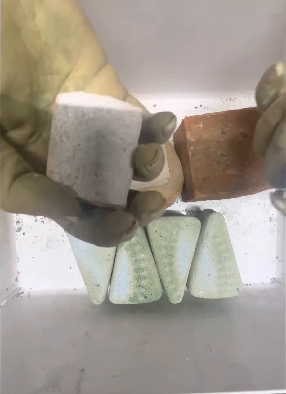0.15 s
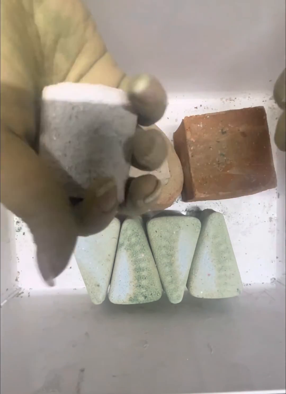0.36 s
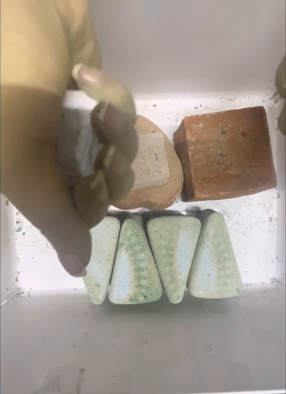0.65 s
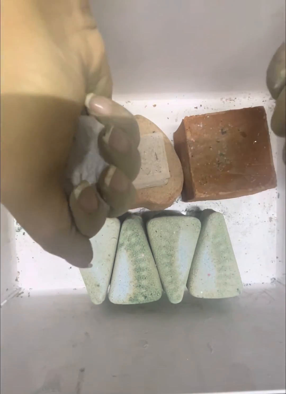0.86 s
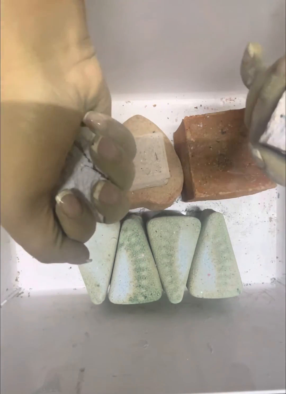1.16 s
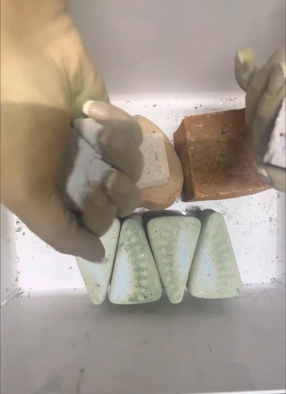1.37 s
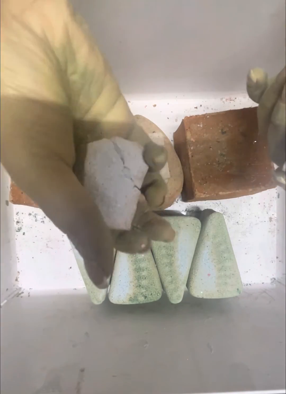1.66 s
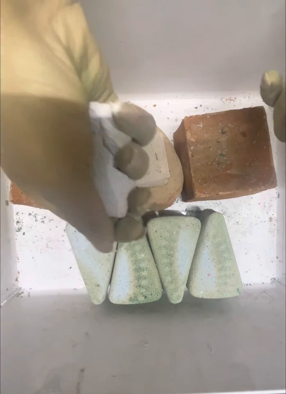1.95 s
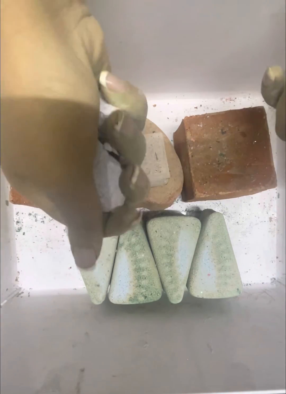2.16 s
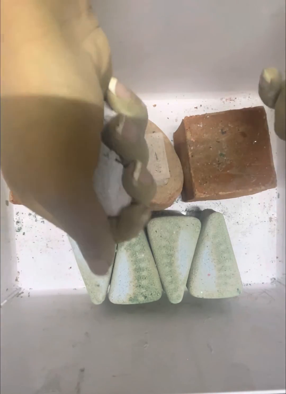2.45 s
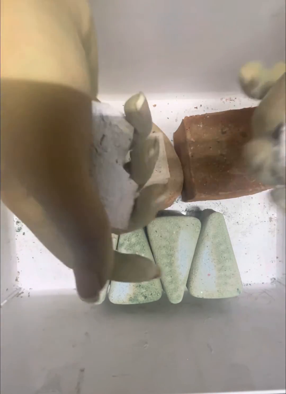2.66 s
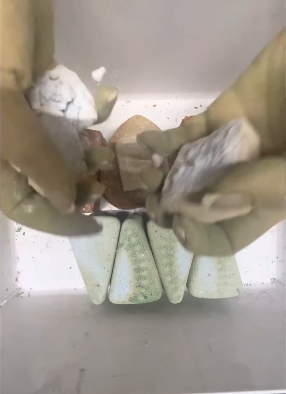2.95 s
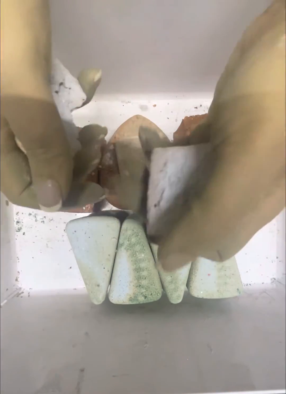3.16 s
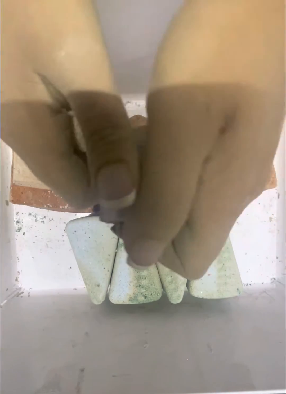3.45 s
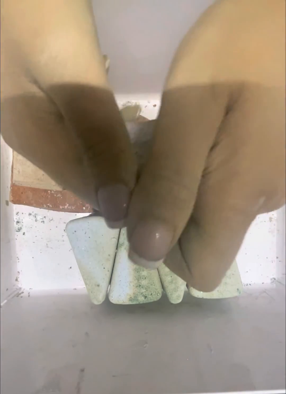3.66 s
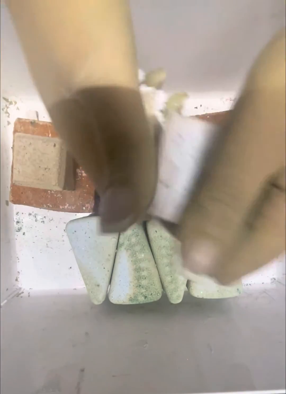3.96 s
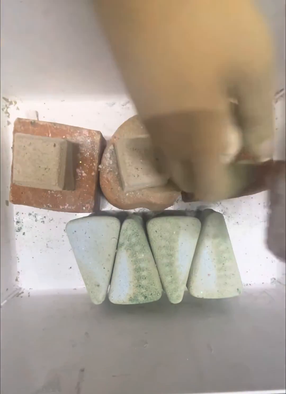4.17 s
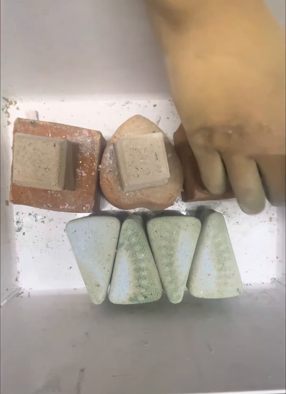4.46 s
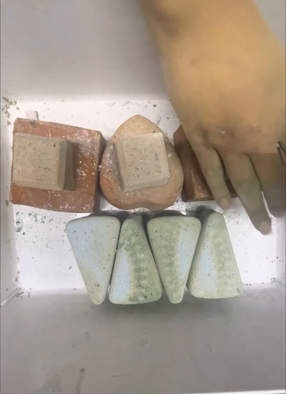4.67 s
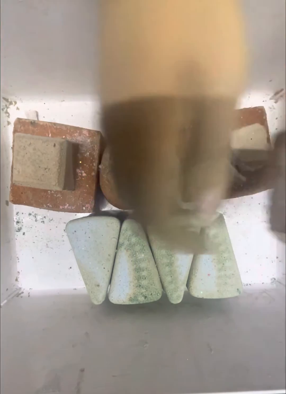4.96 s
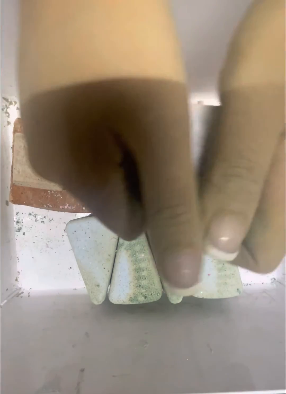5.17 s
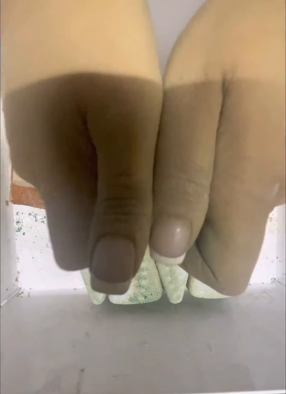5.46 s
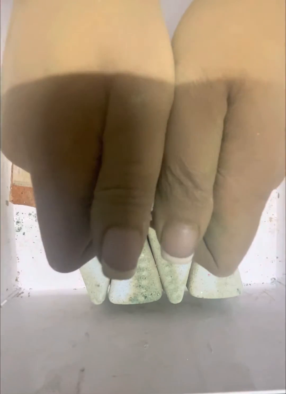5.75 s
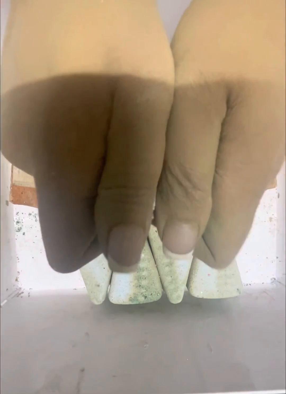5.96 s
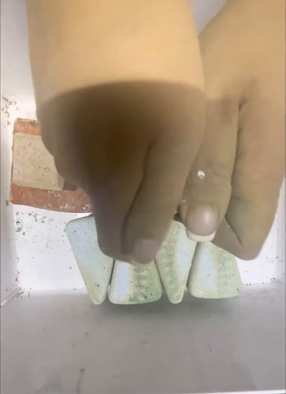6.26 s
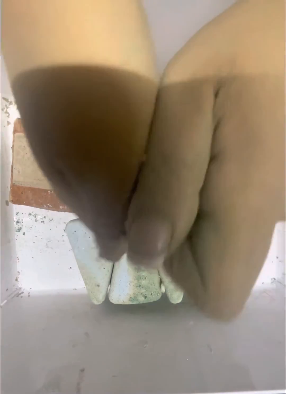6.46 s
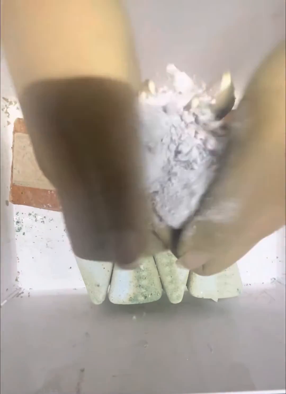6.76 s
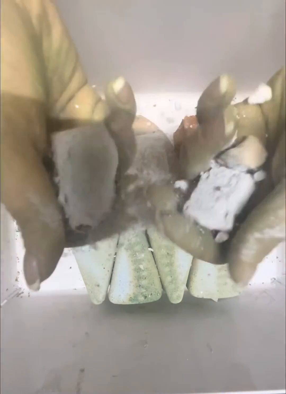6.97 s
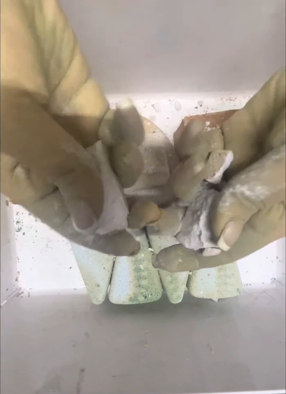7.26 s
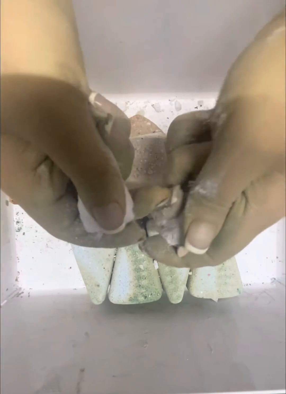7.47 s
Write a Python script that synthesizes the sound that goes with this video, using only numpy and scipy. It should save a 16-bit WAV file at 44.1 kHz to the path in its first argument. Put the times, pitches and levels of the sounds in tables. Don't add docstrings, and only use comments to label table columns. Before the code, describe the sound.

Hard, dry chalk blocks are crushed by hand over a plastic tub. Muffled fist cracks and bright flaking ticks come first, then a loud break near three seconds with pieces knocking the tub. A sparser middle leads to a denser run of snaps, gritty crumbling and falling bits around six to seven seconds. Very close stereo microphone, small quiet room, faint low hum.

```python
import sys
import numpy as np
from scipy import signal
from scipy.fft import rfft, irfft
from scipy.io import wavfile
from scipy.ndimage import uniform_filter1d

SR = 44100
rng = np.random.default_rng(int(sys.argv[2]) if len(sys.argv) > 2 else 0)


def file_out(sig):
    cols = np.atleast_2d(sig).T
    lim = np.clip(cols, -1, 1)
    pcm = np.round(lim * 32767).astype(np.int16)
    wavfile.write(sys.argv[1], SR, pcm)


def voltage_ratio(level):
    return 10 ** (np.asarray(level, float) / 20)


N = 336042


def level(x):
    return x / np.sqrt(np.mean(x ** 2))


def peak(x):
    return x / abs(x).max()


def fade(t, t60_s):
    return np.exp(-np.log(1000) * t / t60_s)


def band(x, lo_hz, hi_hz, order=2):
    return signal.sosfilt(signal.butter(order, [lo_hz, hi_hz], "band", fs=SR, output="sos"), x)


def ring(x, hz, width_hz):
    return signal.lfilter(*signal.iirpeak(hz, hz / width_hz, SR), x)


def on_log_axis(table):
    hz, value = np.transpose(table)
    return np.interp(np.log(np.fft.rfftfreq(N, 1 / SR) + 1), np.log(hz + 1), value)


def curves(table):
    s, *columns = np.transpose(table)
    return [np.interp(np.arange(N) / SR, s, c) for c in columns]


def walk(rate):
    k = int(SR / rate)
    held = np.repeat(rng.standard_normal(N // k + 1), k)
    return level(uniform_filter1d(uniform_filter1d(held, k), k)[:N])


def grains(per_s, spread_db, t60_s):
    starts = rng.random(N) < per_s / SR
    sizes = starts * voltage_ratio(spread_db * np.minimum(rng.exponential(size=N), 2.4))
    return level(signal.lfilter([1], [1, -fade(1 / SR, t60_s)], sizes))


def patches(x, lo_hz, hi_hz, patchy_db, count):
    edges = np.geomspace(lo_hz, hi_hz, count + 1)
    total = 0
    for k in range(count):
        total = total + (-1) ** k * band(x, edges[k], edges[k + 1]) * voltage_ratio(patchy_db * walk(35))
    return level(total)


def strokes(rows, rise_db_s, fall_db_s, rest_db):
    t, power = np.arange(0, N, 32) / SR, voltage_ratio(2 * rest_db)
    for s, hold_s, db in rows:
        early, late = np.maximum(s - t, 0), np.maximum(t - s - hold_s, 0)
        power = power + voltage_ratio(2 * (db - rise_db_s * early - fall_db_s * late))
    return np.interp(np.arange(N) / SR, t, 10 * np.log10(power))


BRIGHT_TOP_HZ, DULL_TOP_HZ = 5230, 2514
FIST_LUMP_LOW_HZ, OPEN_LUMP_LOW_HZ = 1730, 770
IN_FIST = (0, FIST_LUMP_LOW_HZ, BRIGHT_TOP_HZ)

# (time [s], snap peak [dB], lump over snap [dB], tub pitch [Hz])
PALM_BREAKS = [(2.985, -4.5, -8, 495), (3.051, -17.5, -4, 480), (3.273, -40, -6, 660),
               (3.6363, -30, -10.5, 483), (3.7625, -21.5, -8, 490), (3.91, -31, -2, 490),
               (4.4442, -19, -4, 666), (4.4607, -21.5, -19, 478), (4.492, -33.5, -16.5, 663),
               (5.7964, -26.5, -12.5, 623), (5.8176, -10.5, 1.5, 565), (5.8255, -17, -6, 334),
               (5.8446, -12, -12.5, 730), (6.0935, -43, -1, 356), (6.109, -22, -13.5, 390),
               (6.183, -25.5, -11.5, 336), (6.2599, -12, -11.5, 565), (6.2749, -20, -7.5, 313),
               (6.455, -27, -12, 418), (6.5029, -14, -4, 470), (6.538, -23.5, -1.5, 490),
               (6.8403, -6, -8, 581), (6.9224, -29, -2, 490), (6.9689, -23.5, -10, 476),
               (7.6068, -13, -14.5, 388)]


def palm_breaks():
    return [(s, db, lump, lump - 13, 0.034, hz, OPEN_LUMP_LOW_HZ, BRIGHT_TOP_HZ)
            for s, db, lump, hz in PALM_BREAKS]


# (time [s], snap peak [dB], lump over
# snap [dB], burst t60 [s])
FIST_CRACKS = [(0.4197, -27, -17, 0.078), (.475, -40.5, -1, 0.044), (.611, -21, -13.5, 0.048),
               (.617, -10, -14.5, 0.02), (0.8702, -43.5, -11.5, 0.025), (0.967, -10, -7, 0.019),
               (1.304, -43.5, -17, 0.25), (1.382, -40.5, -8.5, 0.071), (1.5455, -36, -21, .05),
               (1.5649, -26, -23, 0.047), (1.6255, -23, -13, 0.069), (1.7526, -32, -19.5, 0.21),
               (1.796, -28.5, -15, 0.053), (1.943, -37, -11, 0.048), (1.9887, -25, -19, 0.029),
               (2.023, -18, -17, 0.01), (2.0641, -29.5, -12, 0.031), (2.13, -25, -16.5, 0.068),
               (2.178, -38, -15, 0.031), (2.206, -35.5, -5, 0.023), (2.22, -22, -18.5, 0.046),
               (2.283, -23.5, -13, 0.031), (2.718, -33, -28, 0.084), (2.951, -39, -27, 0.045),
               (5.264, -30, -16, 0.027), (5.5272, -41.5, -20, 0.028), (5.666, -17.5, -19.5, 0.037),
               (6.148, -20.5, -16.5, 0.08), (6.8032, -21, -15, 0.12), (7.496, -34, -16, 0.025),
               (.444, -40.5, -2.5, 0.061), (0.485, -37, -6.5, .02), (.699, -48.5, -2, 0.016),
            (2.516, -41, -7, 0.034), (3.073, -29.5, -9, 0.037), (3.127, -32, -1, 0.026),
            (3.18, -39, -5, 0.025), (3.223, -34.5, -18, .02), (3.239, -40.5, -16, .02),
            (3.305, -47, -3, .02), (4.86, -48, -1.5, 0.027), (4.937, -49, -6.5, 0.017),
            (5.808, -51, -1, .02), (5.979, -38.5, -11.5, .03), (6.031, -45, -3, .03), (6.047, -37, -7, .02),
            (6.125, -40, 3, .04), (6.16, -32.5, -2, 0.025), (6.165, -30.5, -3, 0.027),
            (6.203, -44, 0, 0.037), (6.231, -38, -11, 0.033), (6.281, -23, -7.5, 0.035),
            (6.293, -21, -17, .04), (6.324, -40, -20, .02), (6.667, -21.5, -19, 0.034),
            (6.82, -35, -7, .04), (6.937, -29, -4, 0.042), (7.052, -39, -9, .03), (7.166, -32, -18, .03),
            (7.179, -31, -16, .02), (7.262, -46, -1, 0.05), (7.294, -49, -2, .03), (7.413, -50, -5, 0.014)]


def fist_cracks():
    return [(s, db, lump, lump - 5, t60, *IN_FIST) for s, db, lump, t60 in FIST_CRACKS]


# (time [s], snap peak [dB], lump over snap [dB], tub over snap [dB], tub pitch [Hz])
LANDINGS = [(2.9906, -25, -0.5, 7.5, 472), (3.0788, -37.5, 11.5, 4, 706), (3.0996, -35.5, -25, -7, 480),
            (3.133, -33.5, 3, -10.5, 656), (3.696, -30.5, -19.5, -21, 475), (4.1204, -28.5, -17, -16, 483),
            (4.2665, -26, -18, -17.5, 480), (4.318, -44.5, 14, 8.5, 650), (4.347, -40.5, 1, -4, 660),
            (4.583, -36, -21.5, -11.5, 352), (4.6848, -17, -22, -11.5, 348), (4.7423, -29.5, -23, -3, 480),
            (4.821, -27.5, -7.5, -15, 465), (6.32, -56, -15.5, -16.5, 746), (6.431, -20.5, -20, -15.5, 368),
            (6.4651, -19, -16.5, -15.5, 650), (6.5995, -31, 2, -12, 404), (6.6569, -18.5, -4, -4.5, 400),
            (6.8979, -29, 2, -3.5, 616), (6.989, -35, -5.5, 2, 343), (3.158, -29, -7.5, -13, 635),
            (4.672, -53, -20, -3, 620), (4.761, -38.5, -22, -3, 423), (6.3404, -23.5, -6.5, -22, 614),
            (7.1488, -27.5, -3, -10.5, 650), (7.205, -49, 8, -2, 504)]


def landings():
    return [(s, db, lump, tub_db, 0.05, hz, OPEN_LUMP_LOW_HZ, DULL_TOP_HZ)
            for s, db, lump, tub_db, hz in LANDINGS]


# (time [s], snap peak [dB], burst t60 [s])
TICKS = [(0.0276, -37.5, 0.15), (.11, -31.5, 0.07), (.193, -22.5, 0.066), (0.257, -42, 0.15),
         (0.328, -40, 0.047), (2.246, -25.5, .032), (2.3318, -36, 0.026), (2.501, -34, 0.32),
         (2.571, -33, 0.13), (2.794, -29, 0.064), (2.9096, -28, 0.039), (2.9651, -32, 0.054),
         (3.3287, -27, 0.17), (3.547, -35, 0.27), (3.607, -35.5, 0.046), (3.6572, -26, 0.065),
         (4.0333, -18.5, 0.13), (4.643, -21, 0.087), (5.05, -44.5, 0.075), (5.209, -36, 0.11),
         (5.301, -40, 0.026), (5.423, -38, 0.055), (5.7139, -36, 0.15), (6.3934, -30, 0.04),
         (6.791, -26, 0.065), (7.3684, -40, 0.026), (7.3874, -22.5, 0.045), (7.552, -28.5, 0.017)]


def ticks():
    return [(s, db, -27.5, -27, t60, *IN_FIST) for s, db, t60 in TICKS]


# (time [s], snap peak [dB], lump over snap [dB])
FLAKES = [(0.5243, -37, -20), (0.5498, -40.5, -15.5), (.5974, -39, -12), (.6469, -31, -14),
          (.8839, -43, -18), (0.902, -48, -10), (.9243, -44.5, -12), (1.256, -46, -12.5),
          (1.4476, -37, -13), (1.509, -40.5, -20), (1.6871, -41, -12), (1.7135, -38.5, -12),
          (1.8193, -29.5, -16.5), (2.1914, -35, -12), (2.8094, -40, -12.5), (2.8629, -40, -16),
          (3.701, -34, -7.5), (3.738, -39, -4), (4.048, -19, -33), (4.298, -30, -21), (4.5974, -47.5, -8),
          (4.6644, -46, -7.5), (5.124, -45, -12), (5.2264, -52.5, -1.5), (5.487, -48, -5),
          (6.5184, -25, -9), (6.7511, -41, -6), (7.2045, -39, -12), (7.2644, -41, -9)]


def flakes():
    return [(s, db - 1.7, lump, lump - 12, 0.028, *IN_FIST) for s, db, lump in FLAKES]


FRONT_S, FRONT_SHARE = 0.0017, 1.27
HAND_HZ, HAND_WIDTH_HZ, HAND_SHARE = 2306, 320, 0.55
BODY_DB, BODY_S = -22, .0025


def cracks(size=4096):
    rows = ticks() + fist_cracks() + flakes() + palm_breaks() + landings()
    t = np.arange(size) / SR
    near, knock = np.zeros(N + size), np.zeros(N + size)
    noise, chance = rng.standard_normal((len(rows), 3, size)), rng.random((len(rows), 3))
    t60_s = np.clip(np.array(rows)[:, 4:5], .01, .2)
    shape = (1 - np.exp(-t / 0.00069)) * fade(t, t60_s)
    spurts = voltage_ratio(3.72 * level(uniform_filter1d(noise[:, 2], size=24)))
    spurts = spurts * (1 + FRONT_SHARE * np.exp(-t / FRONT_S))
    snaps = band(noise[:, 0] * shape ** 1.64 * spurts, 6240, 14060)
    pushes = band(noise[:, 1] * (t / .002) * np.exp(-t / 0.0019), 331, 830, order=3)
    bodies = band(noise[:, 0] * (t / BODY_S) * np.exp(-t / BODY_S), 870, 1354)
    rough = noise[:, 1] * shape * spurts
    for k, (s, db, lump_db, tub_db, _, tub_hz, low_hz, top_hz) in enumerate(rows):
        snap = snaps[k] + 0.13 * ring(snaps[k], 5000 + 3000 * chance[k, 2], 350)
        lump, push = band(rough[k], low_hz, top_hz), pushes[k]
        hollow = HAND_SHARE * ring(lump, HAND_HZ * (0.9 + 0.19 * chance[k, 1]), HAND_WIDTH_HZ)
        lump_note = 0.24 * ring(lump, low_hz + 900 * chance[k, 0], 460)
        lump = peak(lump + hollow + lump_note)
        if tub_hz:
            push = push + 5.9 * ring(push, tub_hz, 77)
            lump = lump + voltage_ratio(BODY_DB) * peak(bodies[k])
        i = max(int((s - .0008) * SR), 0)
        near[i:i + size] += voltage_ratio(db) * (peak(snap) + voltage_ratio(lump_db + 4.5) * lump)
        target = knock if tub_hz else near
        target[i:i + size] += voltage_ratio(db + tub_db - 6.5) * peak(push)
    return near[:N], knock[:N]


# (time [s], pitch [Hz], peak level [dB])
CHIPS = [(1.302, 3240, -51.5), (2.497, 10700, -36.5), (2.506, 7240, -42), (2.572, 10620, -39),
         (2.962, 5920, -45), (3.098, 7250, -27), (4.644, 6900, -42), (4.646, 4960, -44), (4.645, 5500, -48),
         (4.667, 4300, -52), (4.688, 4500, -44), (4.744, 5320, -48), (4.744, 7100, -49), (4.821, 2300, -44),
         (7.054, 1950, -45), (7.054, 3500, -47), (6.806, 5070, -38), (6.82, 1910, -42), (6.466, 2030, -42),
         (.616, 3720, -28), (.617, 6900, -32), (4.764, 6150, -55), (4.899, 3340, -63), (4.9, 4160, -57),
         (5.824, 2320, -20), (6.467, 3430, -27), (6.466, 4240, -37), (6.789, 6100, -37),
         (6.804, 4230, -29.5), (6.94, 3550, -38), (6.976, 3650, -39), (5.797, 6600, -45)]


def chips(size=4096):
    t, out = np.arange(size) / SR, np.zeros(N + size)
    for s, hz, db in CHIPS:
        rough = 1 + 0.37 * level(uniform_filter1d(rng.standard_normal(size), size=80))
        shape = (1 - np.exp(-t / 0.00083)) * fade(t, 0.042)
        i = int(s * SR)
        out[i:i + size] += voltage_ratio(db) * rough * np.sin(2 * np.pi * hz * t) * shape
    return out[:N]


# (time [s], hold [s], level [dB], pitch [Hz], width [Hz])
SQUEAKS = [(2.9, .26, -64.5, 6700, 254), (2.8, 0.045, -54, 6080, 398), (3.4, 0.02, -56, 6030, 402),
           (4.8, 0.35, -79.5, 2195, 280), (5.994, 0.28, -60, 2140, 395), (7.056, .025, -58, 7100, 359),
           (7.087, 0.015, -48, 7490, 250), (5.9, 0.014, -51, 3350, 300), (4.953, 0.017, -67, 7200, 140),
           (4.885, 0.035, -76, 3350, 200), (5.9, .05, -62.5, 10700, 350), (4.6, .01, -61.5, 10700, 300),
           (4.945, .02, -62, 12000, 300)]


def squeaks():
    air, waver = rng.standard_normal(N), 2.0 * walk(30)
    out = np.zeros(N)
    for s, hold_s, db, hz, width_hz in SQUEAKS:
        note = level(ring(ring(air, hz, width_hz), hz, width_hz))
        out += note * voltage_ratio(strokes([(s, hold_s, db)], 900, 400, -110) + waver)
    return out


# (time [s], hold [s], dust level [dB], crumbs level [dB])
RUBS = [(0.0, 0.21, -74, -76.5), (.425, 0.06, -57.5, -63), (3.94, 0.034, -60.5, -63), (6.7, 0.09, -60, -71),
        (1.39, 0.21, -58.5, -66.5), (1.6, 0.13, -62.5, -67.5), (1.88, 0.28, -61.5, -63),
        (2.51, 0.36, -59, -71.5), (3.0, 0.089, -57, -58.5), (3.15, 0.051, -54, -51),
        (3.33, 0.15, -58.5, -65), (3.66, 0.1, -61, -62), (3.85, 0.043, -58.5, -70),
        (5.305, 0.034, -51, -60), (5.42, 0.17, -71, -81), (5.72, 0.046, -68, -65.5),
        (6.03, 0.23, -54, -53.5), (6.36, 0.32, -53, -53), (6.93, 0.16, -48, -54.5), (7.1, 0.18, -59, -59),
        (7.36, 0.14, -64, -62)]
# (time [s], dust level [dB], crumbs level [dB])
SLIPS = [(.24, -79, -71), (.63, -63, -66), (.88, -63, -78), (.99, -81, -63.5), (1.27, -64, -80),
         (1.79, -53.5, -58.5), (2.899, -51.5, -63), (4.059, -60, -62.5), (4.159, -59, -62),
         (4.277, -50.5, -70), (4.46, -65, -58), (4.69, -78, -78), (4.835, -64, -68), (4.939, -65.5, -77),
         (5.075, -73.5, -81.5), (5.13, -67, -74), (5.22, -73, -72.5), (5.84, -45, -53), (6.278, -44, -57),
         (7.62, -57, -59)]
SLIP_HOLD_S = 0.0076


def rubbing():
    moves = list(RUBS) + [(s, SLIP_HOLD_S, dust, crumb) for s, dust, crumb in SLIPS]
    dust_db = strokes([(s, hold, dust) for s, hold, dust, _ in moves], 378.5, 293, -76.5)
    crumb_db = strokes([(s, hold, crumb) for s, hold, _, crumb in moves], 299, 159, -80)
    rub = grains(320, 5.0, .016)
    slide = uniform_filter1d(rub, size=50) * voltage_ratio(1.5 * walk(24))
    dust = band(rng.standard_normal(N) * (slide + 0.33), 7040, 15000, order=3)
    dust = patches(dust, 4030, 13730, patchy_db=4.0, count=13)
    dust = level(dust + 0.3 * ring(dust, 10750, 720))
    crumbs = rng.standard_normal(N) * (rub + 0.69 * grains(160, 4.9, 0.085) + 0.27)
    crumbs = patches(crumbs, 637, 5140, patchy_db=4.0, count=12)
    crackle = level(band(rng.standard_normal(N) * grains(45, 4.5, .005), 1800, 21000))
    hiss = voltage_ratio(dust_db + 7.5) * dust + voltage_ratio(crumb_db - 0.65) * crumbs
    return hiss + voltage_ratio(np.minimum(dust_db, -52) - 12) * crackle


# (time [s], hold [s], level [dB])
SHOWERS = [(1.9, 0.3, -78.5), (3.12, 0.065, -55), (3.8, 0.17, -65), (4.1, 0.075, -73), (4.35, 0.14, -62),
           (4.79, 0.069, -61), (5.88, 0.32, -69.5), (6.3, 0.23, -60.5), (6.5, 0.18, -47),
           (6.83, 0.069, -48), (6.94, 0.026, -47), (7.15, 0.072, -55)]


def showers():
    rattle_db = strokes(SHOWERS, 249, 125, -84.5)
    rattle = level(band(rng.standard_normal(N) * (grains(60, 6.0, 0.03) + 0.33), 280, 780, order=3))
    return voltage_ratio(rattle_db + 3.5) * rattle


# (pitch [Hz], width [Hz], level [dB], left over right [ratio])
TUB = [(352, 12, -1, 1.2), (490, 51, -2.5, 1.75), (650, 100, 2.5, -0.22), (686, 210, -11, -0.98),
       (990, 260, -4, 0.99)]


def tub(x):
    return sum(voltage_ratio(db) * ring(x, hz, w) * np.array([[left], [1]]) for hz, w, db, left in TUB)


# (time [s], peak level [dB], pitch [Hz])
THUMPS = [(0.615, -37, 178), (0.969, -33.5, 195), (2.986, -49, 166), (2.9855, -24, 519), (4.05, -54, 477),
          (4.682, -36, 203), (4.74, -34.5, 220), (5.665, -46, 335), (0.193, -50.5, 420),
          (0.421, -56.5, 482), (4.762, -34, 90.8), (4.821, -39.5, 167), (5.816, -29.5, 288),
          (5.842, -33, 132), (6.259, -40.5, 130), (6.435, -38.5, 202), (6.654, -39, 290),
          (7.608, -37.5, 310)]


def thumps(size=4096):
    t, out = np.arange(size) / SR, np.zeros(N + size)
    shape = (1 - np.exp(-t / 0.00046)) * np.exp(-t / 0.0077)
    for s, db, hz in THUMPS:
        i = int(s * SR)
        out[i:i + size] += voltage_ratio(db + 4.5) * np.sin(2 * np.pi * hz * t) * shape
    return out[:N]


# (pitch [Hz], lead [radians])
PORTS = [(0, 0), (520, -.4), (900, 0), (2600, .7), (4000, .6), (4700, 3.1), (5300, 5.8), (6400, 6.7),
         (8200, 9.0), (9100, 8.8), (9720, 9.42), (10500, 10.5), (12200, 12.6), (14000, 13.1), (15300, 15.5)]


def at_both_ports(x):
    lead = np.exp(.5j * on_log_axis(PORTS) * np.array([[1], [-1]]))
    return irfft(rfft(x) * lead, N) * voltage_ratio(np.array([[-.8], [.7]]))


def echoes(lo_hz, hi_hz, t60_s, first_s):
    t = np.arange(SR // 3) / SR
    tail = band(rng.standard_normal((2, len(t))), lo_hz, hi_hz) * fade(t, t60_s) * (t > first_s)
    return tail / np.sqrt(np.sum(tail ** 2, axis=1, keepdims=True))


def reflections(near):
    space = voltage_ratio(-18.5) * echoes(410, 5800, 0.25, 0.0036)
    space = space + voltage_ratio(-16) * echoes(3770, 5330, .02, .0004)
    space = space + voltage_ratio(-10.0) * echoes(11000, 18000, .02, .0004)
    return signal.fftconvolve(near, space, axes=1)[:, :N]


# (time [s], low hum level [dB], upper hum level [dB])
HUM = [(0.0, -55.5, -78), (0.63, -59, -77), (0.78, -63.5, -69), (1.99, -54, -99), (2.29, -55.5, -59),
       (2.48, -54, -73), (3.4, -59, -53), (3.69, -68, -61), (4.67, -52.5, -64), (4.75, -45, -49.5),
       (4.94, -52, -58.5), (5.2, -51.5, -50), (6.64, -61.5, -71.5), (7.45, -53.5, -64), (7.62, -55, -68)]
# (low pitch [Hz], upper pitch [Hz])
HUM_HZ = (58.5, 87.9)


def machine_hum():
    overtone_hz = 117.6 + 2.515 * walk(9.4)
    hum = voltage_ratio(-61.5 + 2.5 * walk(12)) * np.sin(2 * np.pi * np.cumsum(overtone_hz) / SR)
    for hz, db in zip(HUM_HZ, curves(HUM)):
        turns = np.cumsum(hz + 0.76 * walk(2.607)) / SR
        hum = hum + voltage_ratio(db + 2.5 + walk(6.7)) * np.sin(2 * np.pi * turns)
    return hum


# (pitch [Hz], level per Hz [dB])
RUMBLE = [(26, -32.5), (38, -5.5), (64, -4), (115, -4), (163, -6.5), (237, -9.5), (459, -30), (900, -41),
          (1170, -64.5), (1980, -120)]


def room_rumble():
    colour = voltage_ratio(on_log_axis(RUMBLE))
    mid, side = (level(irfft(rfft(rng.standard_normal(N)) * colour, N)) for _ in range(2))
    return voltage_ratio(-58) * (mid + 0.29 * side * np.array([[1], [-1]]))


def scene():
    snap, knock = cracks()
    chalk = at_both_ports(snap + rubbing() + chips() + squeaks() + 2.15 * knock)
    near = chalk + 2.44 * tub(knock) + 1.86 * tub(showers())
    return near + reflections(near) + thumps() + machine_hum() + room_rumble()


def top_cut(x):
    return signal.sosfilt(signal.butter(12, 16480, fs=SR, output="sos"), x)


# (pitch [Hz], level [dB])
MIC = [(200, 0), (3400, -.5), (3800, -3.5), (4150, 0), (4500, 3), (4850, 1), (5500, 1), (7400, 0),
       (8000, 2), (8900, 5), (9650, -1), (10000, 3.5), (10350, 4), (10750, 6.5), (11150, -1), (12000, -9),
       (13000, -14), (14000, -18), (15600, -20), (16000, -50)]


def record(dry):
    heard = irfft(rfft(dry) * voltage_ratio(on_log_axis(MIC)), N)
    mix = .9 * np.tanh(heard / .9)
    return top_cut(mix)


dry = scene()
out = record(dry)
file_out(out)
```